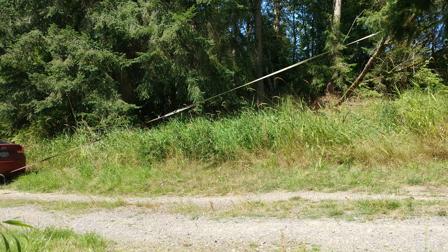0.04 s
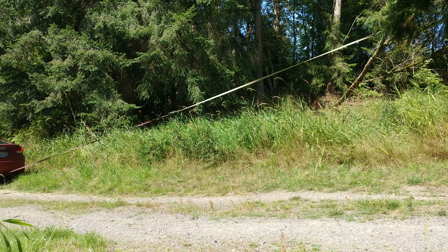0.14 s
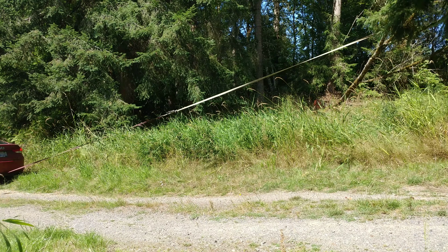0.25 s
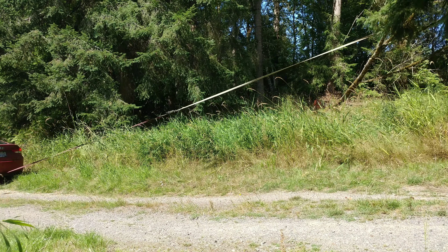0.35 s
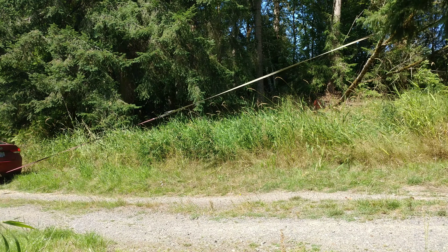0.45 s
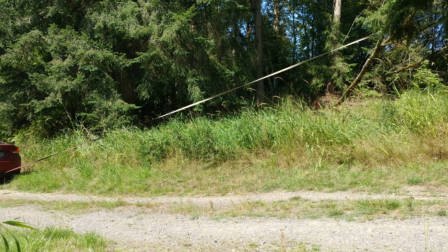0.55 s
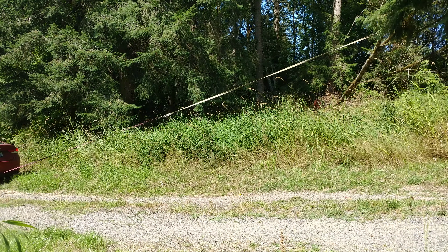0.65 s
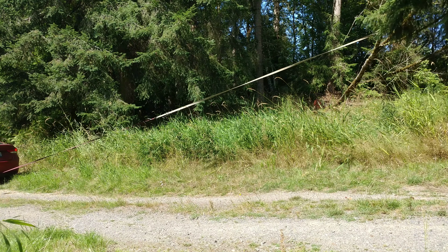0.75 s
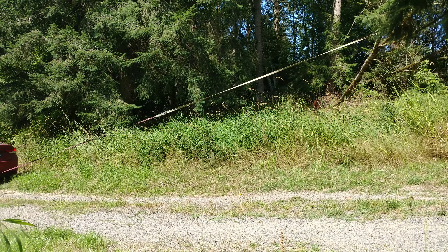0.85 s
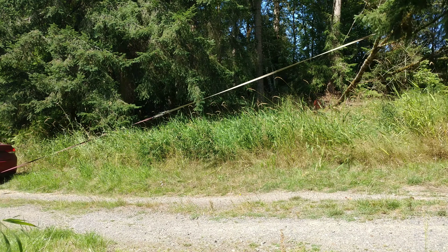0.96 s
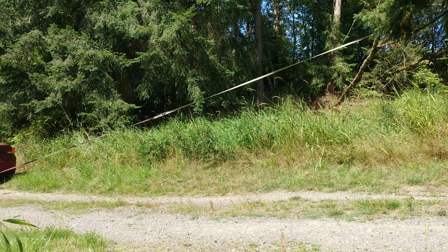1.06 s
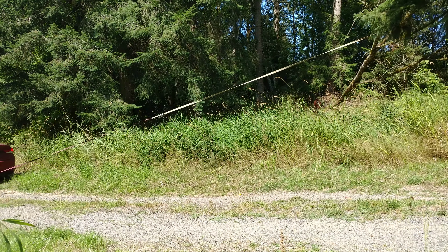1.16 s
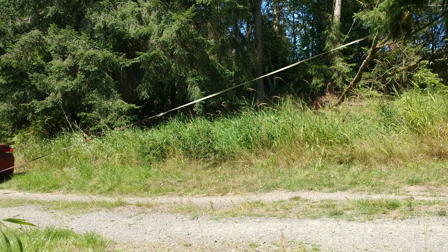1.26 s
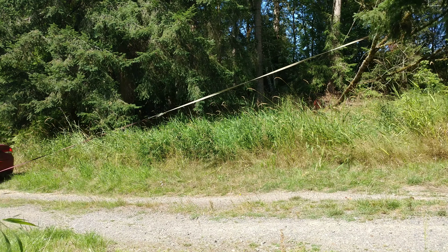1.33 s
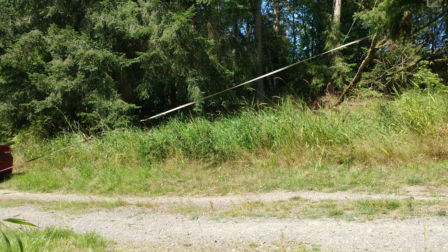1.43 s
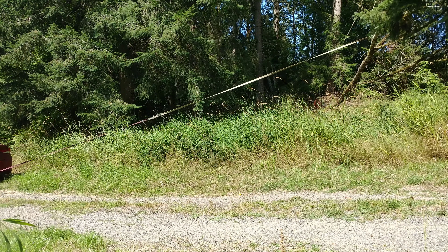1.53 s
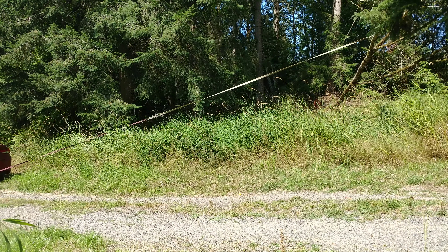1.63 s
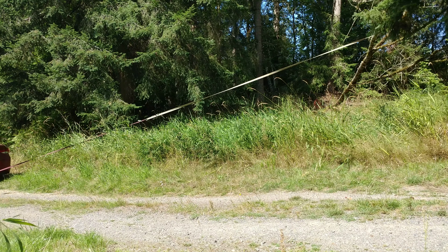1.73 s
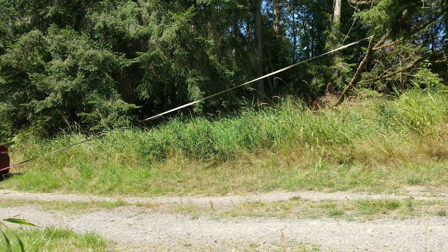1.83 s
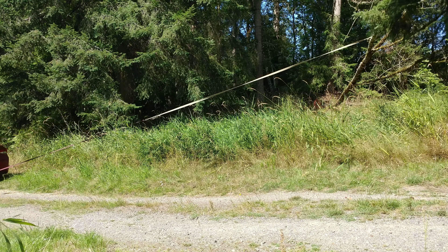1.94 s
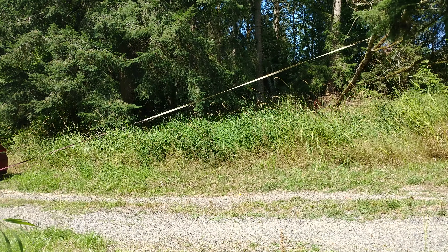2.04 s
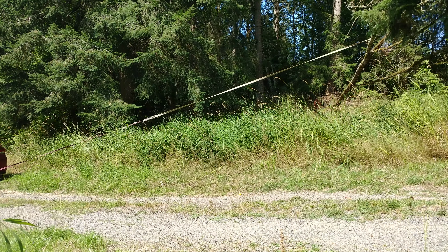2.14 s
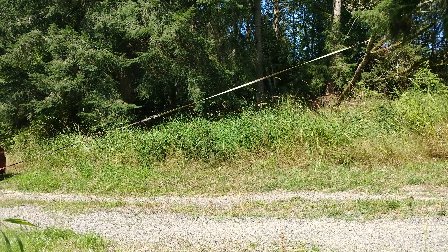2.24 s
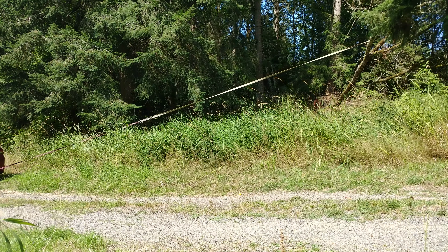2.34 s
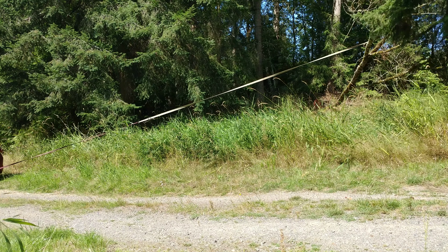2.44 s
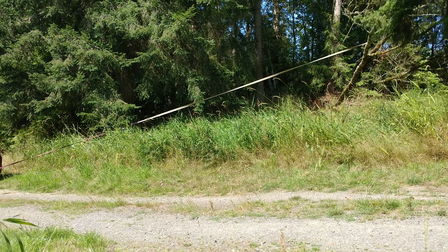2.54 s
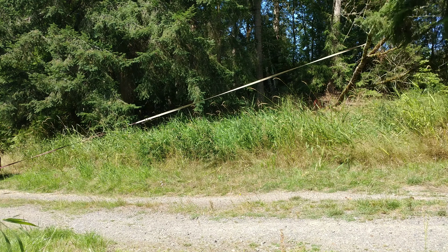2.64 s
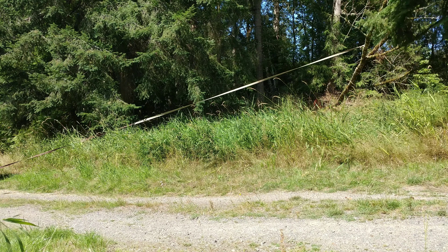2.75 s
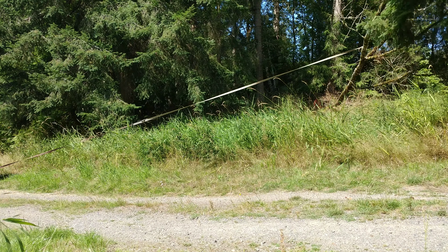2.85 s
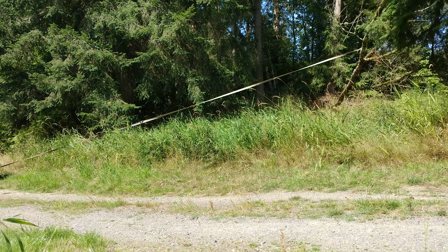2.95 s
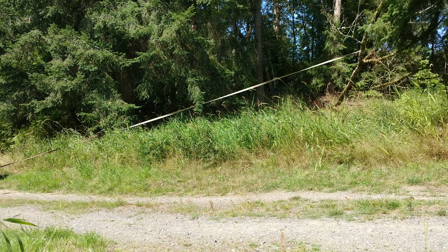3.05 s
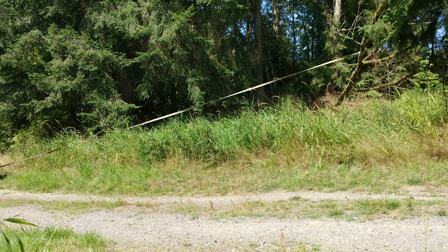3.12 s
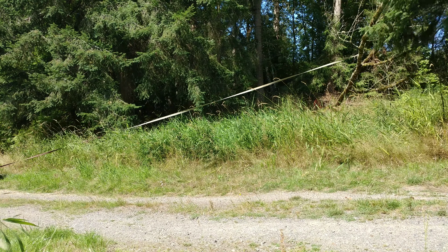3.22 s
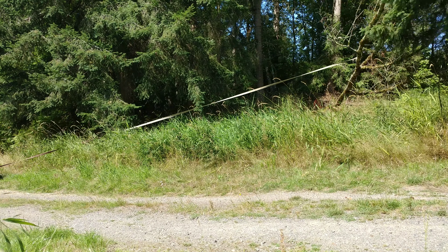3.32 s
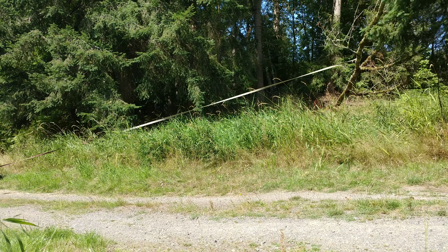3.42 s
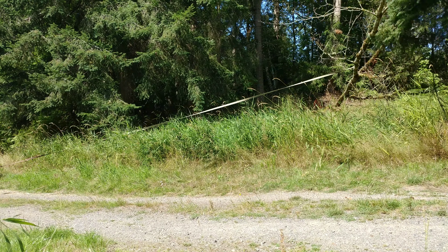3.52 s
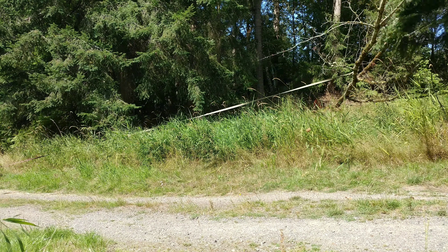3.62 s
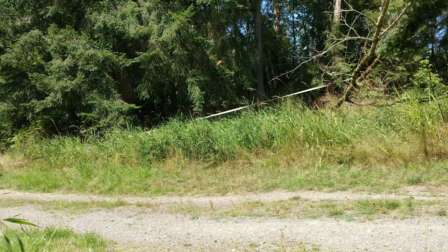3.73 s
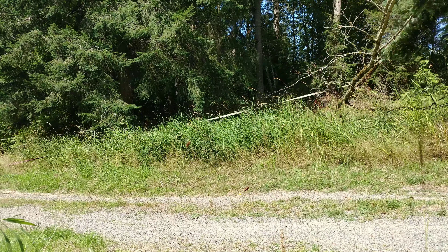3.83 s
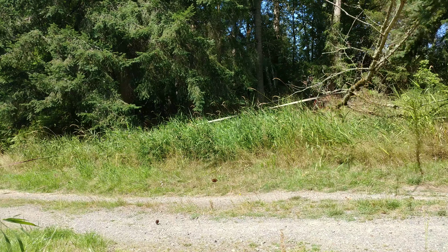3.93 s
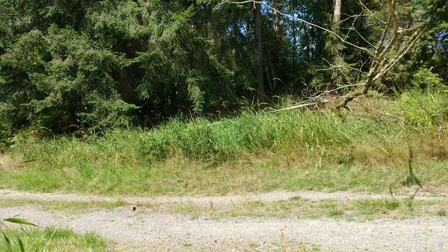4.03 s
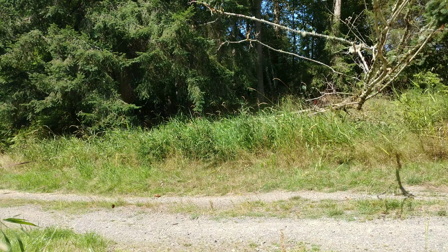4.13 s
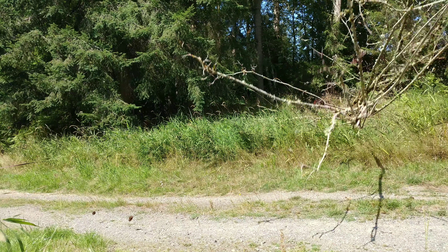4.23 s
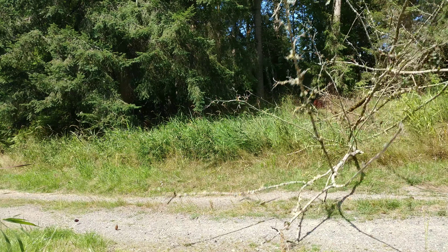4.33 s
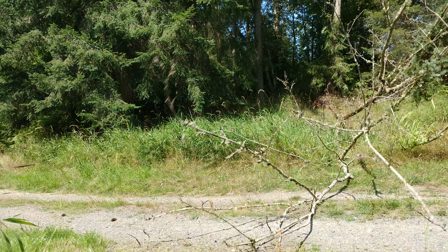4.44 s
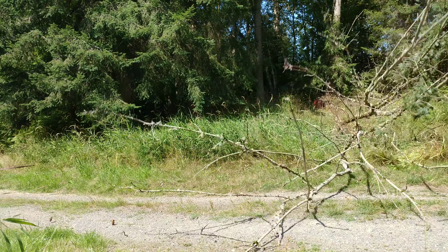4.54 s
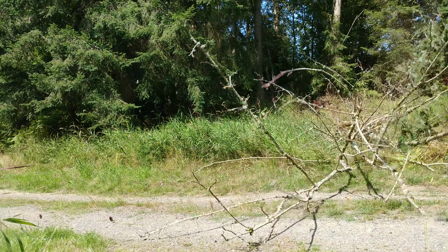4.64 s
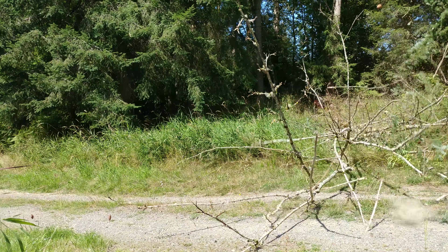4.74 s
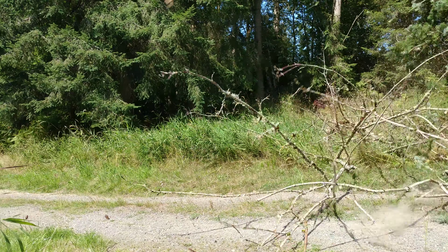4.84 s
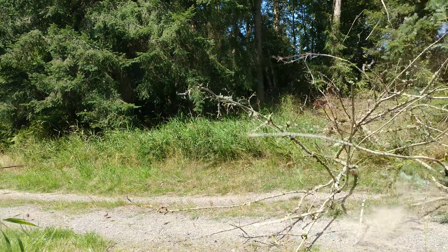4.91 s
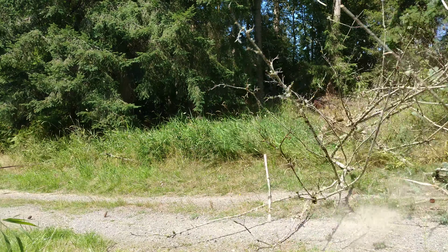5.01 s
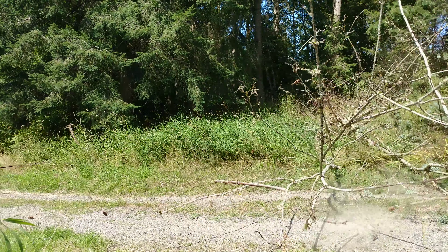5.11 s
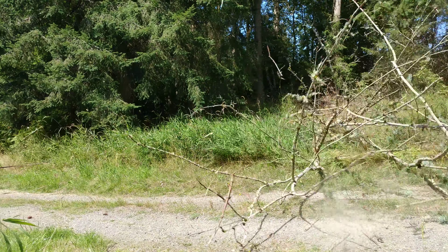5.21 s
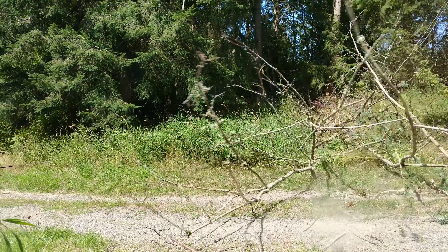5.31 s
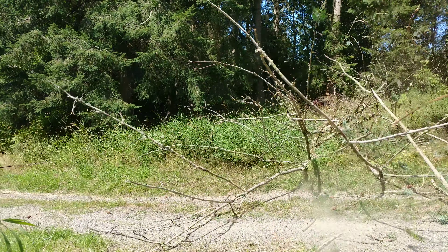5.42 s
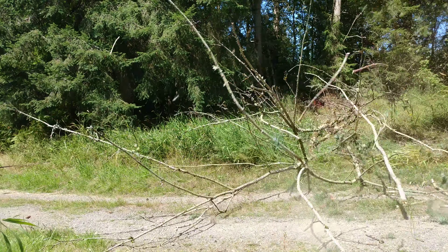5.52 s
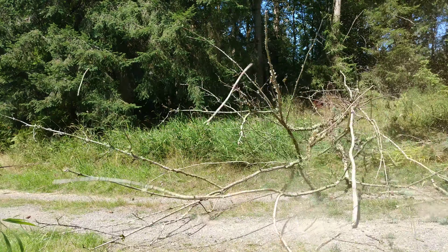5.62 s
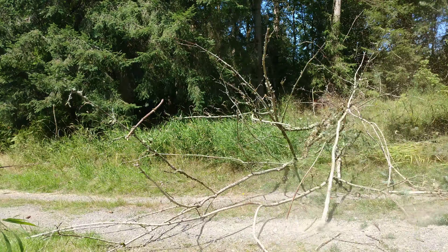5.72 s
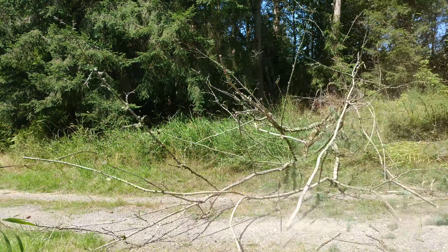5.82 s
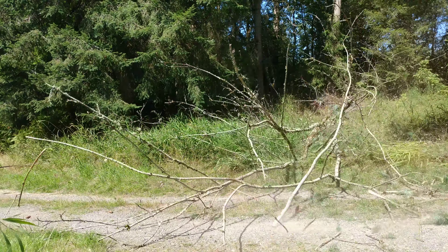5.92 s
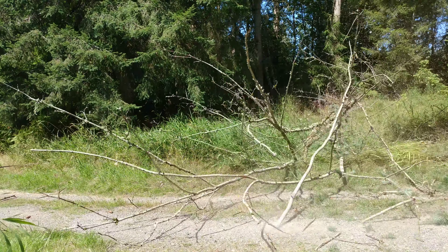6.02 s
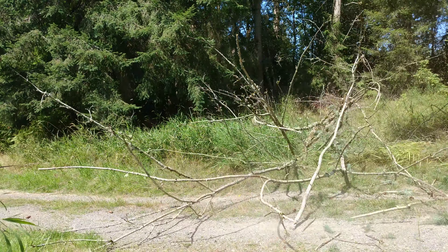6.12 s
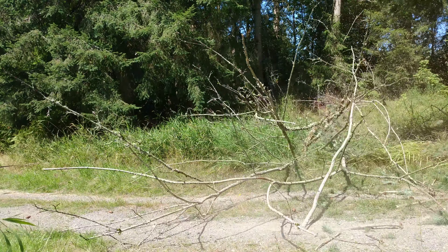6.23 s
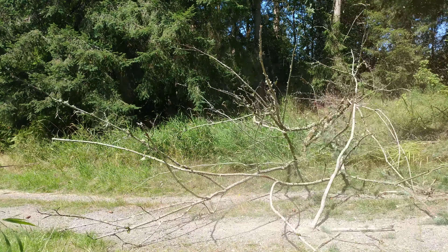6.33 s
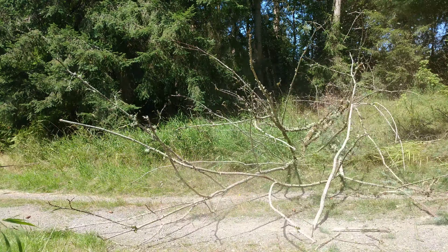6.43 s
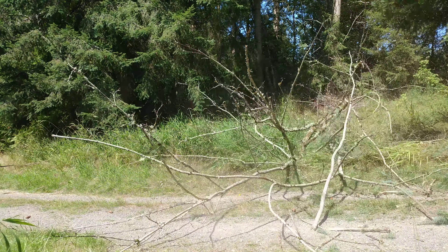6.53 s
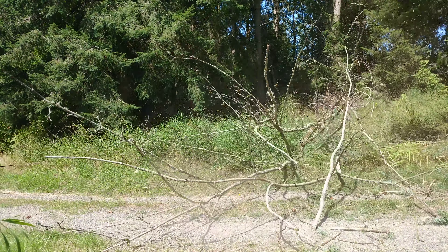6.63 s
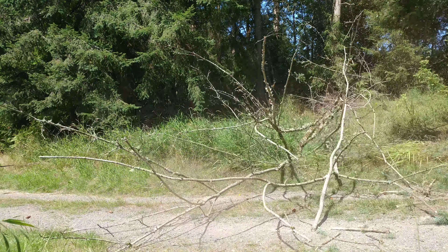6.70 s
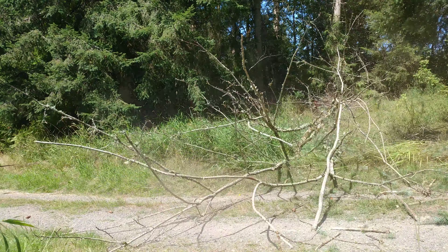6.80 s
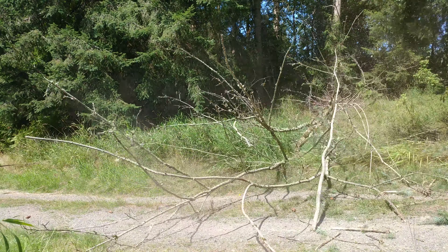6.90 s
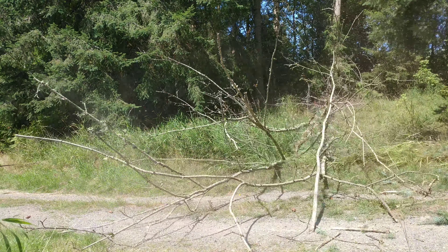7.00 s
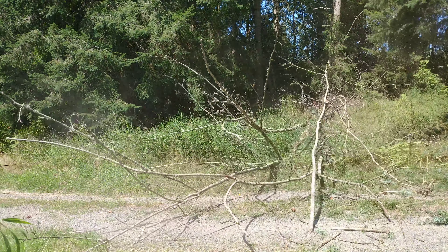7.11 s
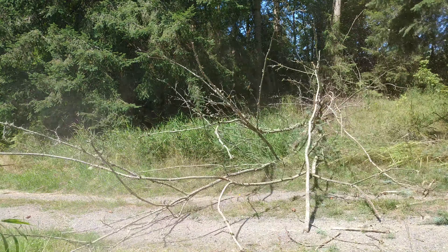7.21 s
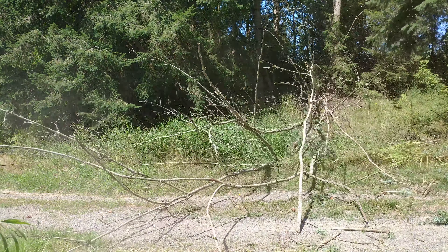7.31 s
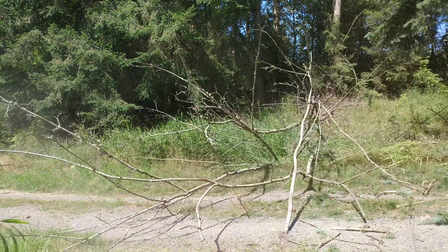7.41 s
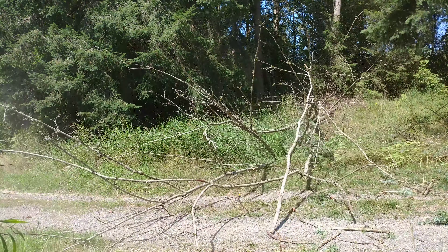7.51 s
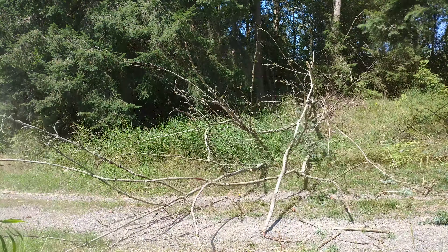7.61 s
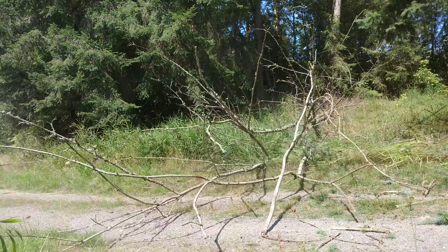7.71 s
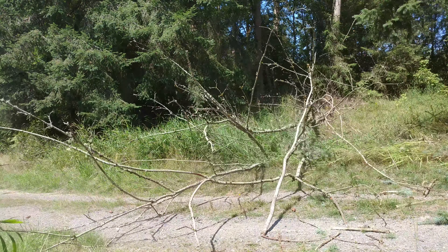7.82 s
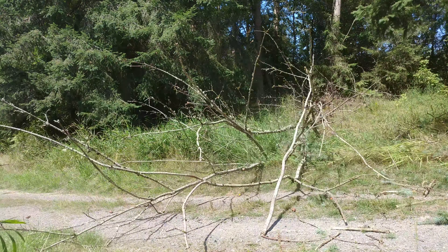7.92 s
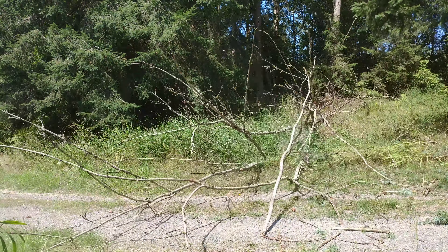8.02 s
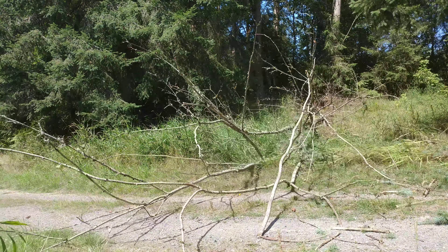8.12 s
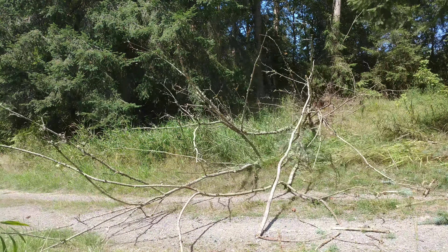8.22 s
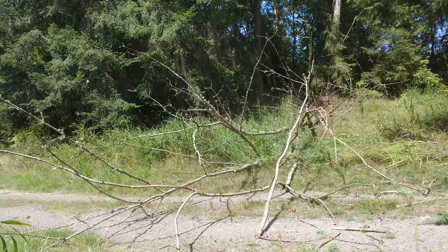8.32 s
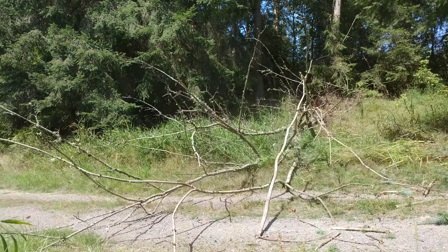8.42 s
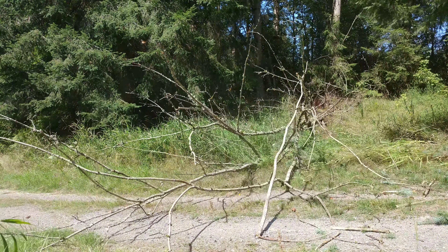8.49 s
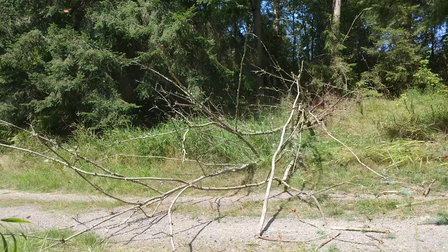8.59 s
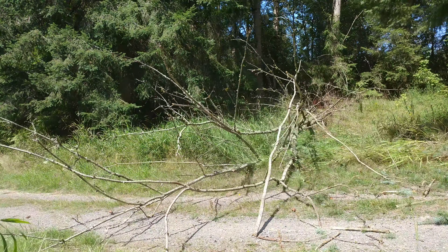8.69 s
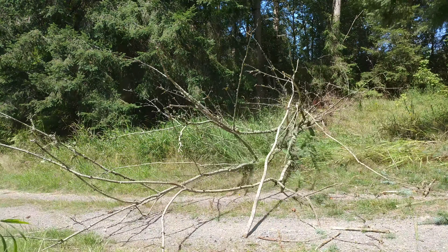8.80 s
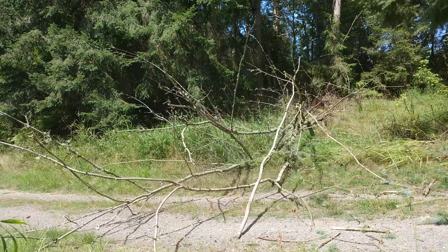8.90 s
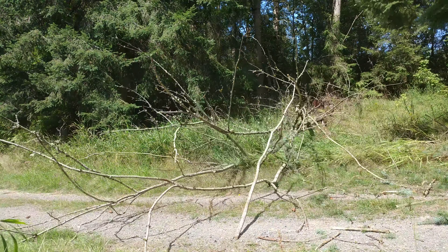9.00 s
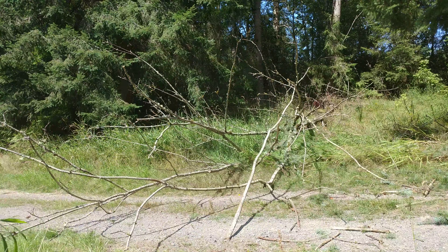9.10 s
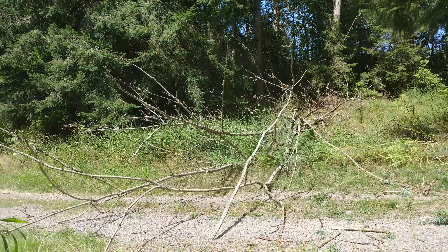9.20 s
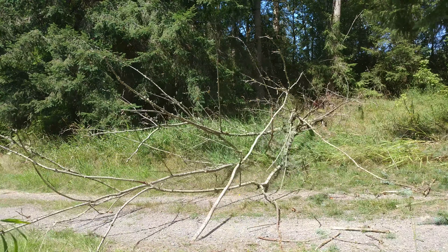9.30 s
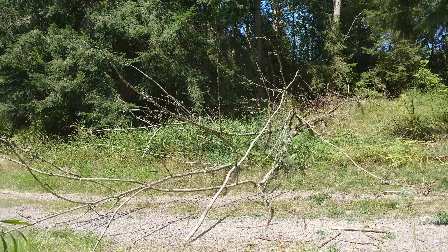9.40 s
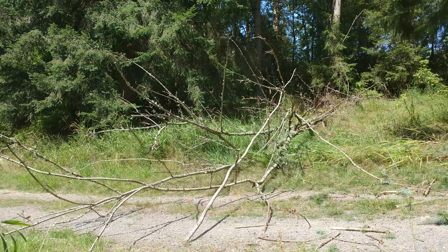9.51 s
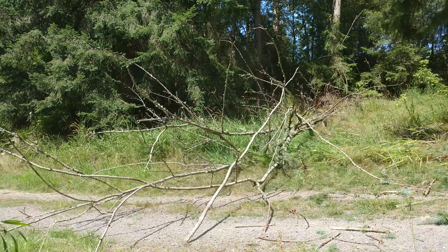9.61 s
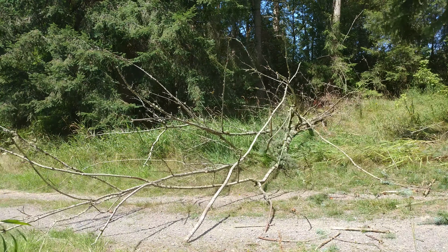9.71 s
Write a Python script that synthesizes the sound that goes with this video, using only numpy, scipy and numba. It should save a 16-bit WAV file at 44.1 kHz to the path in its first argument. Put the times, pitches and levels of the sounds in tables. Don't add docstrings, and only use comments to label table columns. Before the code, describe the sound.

Open air at a wood's edge, small stereo microphone some metres off, faint low engine idle and light wind rumble. From 0 to 1.8 s, sparse dry ticks and small fibre cracks, each returned briefly by the trunks. A stronger crack at 1.9 s with a low thud, another at 2.7 s. From 2.9 s a crackle of twigs and grinding limbs grows, snaps coming faster through 3.4 to 4.4 s. At about 4.6 to 5 s the crown lands: the loudest dense splintering, hard bright snaps, raining debris and a broad ground thud, peaks clipping. Heavy breaking continues to 5.6 s, a sharp snap at 5.94 s, then rapid thinning with small ticks until 7. At 7.3 s a dry crack; at 7.6 s a loud snap cluster and soft limb drop. After 8 s only faint needle rustle, tiny ticks and soft wind puffs, to about 9.7 s.

```python
import sys
import numpy as np
from scipy import signal
from scipy.fft import rfft, irfft, next_fast_len
from scipy.io import wavfile
from scipy.ndimage import uniform_filter1d
from numba import njit

SR = 44100
rng = np.random.default_rng(int(sys.argv[2]) if len(sys.argv) > 2 else 0)


def inscribe(sig):
    pcm = np.round(np.clip(np.atleast_2d(sig).T, -1, 1) * 32767)
    wavfile.write(sys.argv[1], SR, pcm.astype(np.int16))


def convert_level_to_amplitude(level_db):
    exponent = np.asarray(level_db, float) / 20
    return 10 ** exponent


N = 429975
T = np.arange(N) / SR

# start_s, peak level_db, pitch_hz
TWIG_TICKS = [(0.4864, -33, 5280), (0.9128, -34, 9030), (3.395, -12, 1820), (4.4021, -9, 4500),
              (4.6532, -4, 5100), (4.78, 0, 4900), (4.9163, 1, 3850), (5.277, -8, 4400),
              (5.2905, -9.5, 1530), (5.3138, -9, 2620), (5.3805, -18.5, 1540), (5.4326, -16, 3230),
              (5.4695, -11.5, 4730), (5.5739, -6.5, 6250), (5.835, -14.5, 2760), (6.0828, -17.5, 2740),
              (6.593, -30, 3500), (7.317, -22, 1850), (7.9149, -34, 2104)]
# start_s, length_ms, level_db, pitch_hz
LIMB_KNOCKS = [(.6285, 7.14, -33, 3740), (.7705, 7, -32.5, 3630), (5.703, 40, -28, 980),
               (5.885, 60, -29, 1006), (6.225, 50, -40.5, 1050), (7.284, 13.95, -22.5, 690),
               (7.582, 28, -20, 600), (5.615, 40, -24.5, 1006), (5.767, 23, -19, 980),
               (1.912, 30, -30, 589), (4.04, 45, -26.5, 1400), (9.459, 9.6, -35.5, 1020),
               (8.88, 60, -55, 1000), (3.866, 19, -30, 1400), (8.96, 90, -54, 900), (9.17, 90, -56, 950),
               (9.39, 60, -49, 1100), (5.212, 18, -22, 1600)]
# start_s, splintering_ms, crack_db, limb_knock_db
BARKY_ALOFT = [(.3038, 5.9, -39, -53), (.3901, 3.8, -48, -53), (.5927, 7.6, -46, -67),
               (.6076, 7.9, -46, -67), (1.3649, 3.85, -29, -36), (1.6403, 10.2, -37.5, -48.5),
               (2.5387, 3.4, -26.5, -37.5), (3.0147, 19.7, -33, -31.5), (3.0945, 6.8, -30, -41),
               (3.281, 4.5, -28, -41), (3.6452, 5.7, -18.5, -36), (3.6637, 30, -30.5, -45.5),
               (3.8069, 16, -47, -39), (3.8852, 6.4, -27, -30.5), (3.9306, 7, -25, -28),
               (3.9635, 12, -28, -24.5), (4.0977, 6, -32, -38), (4.2858, 12, -18, -33.5),
               (4.3541, 17, -20.5, -26), (4.3915, 13, -30.5, -37.5), (4.455, 36, -23, -24),
               (4.5896, 3, -15, -43.5)]
# start_s, splintering_ms, crack_db, limb_knock_db
BARKY_GROUNDED = [(4.6245, 15, -25, -39), (4.6434, 12, -22.5, -39), (4.6759, 43.5, -16.5, -20),
                  (4.805, 29.6, -17.5, -14.5), (4.8365, 40.3, -19.5, -15), (5.2541, 9.7, -21, -37),
                  (5.3927, 44, -38, -40), (5.526, 12, -29, -28.5), (5.5344, 20, -16.5, -20.5),
                  (5.6816, 9.3, -27, -46), (5.787, 6, -25, -33), (6.4174, 17.3, -44, -44.5),
                  (6.6688, 6.7, -38.5, -61), (6.8869, 13.5, -41.5, -57), (7.1004, 43, -46, -43.5),
                  (7.2804, 14, -27, -24), (8.6074, 19, -54, -59), (8.84, 72, -64, -63)]
# start_s, splintering_ms, crack_db, limb_knock_db
BARK_SHREDS = [(.3542, 4.1, -45.5, -56), (.7308, 4.2, -54, -91), (1.7864, 3.5, -36.5, -49),
               (1.8533, 7.3, -45, -44), (2.876, 6.9, -40, -37), (3.4816, 16, -37.5, -26),
               (3.5624, 40, -43.5, -31), (3.9525, 7.4, -32.5, -35.5), (5.7025, 10, -39, -40),
               (7.247, 5, -46, -60), (8.22, 72, -67, -69), (8.8279, 5.7, -44.5, -58)]
# start_s, splintering_ms, crack_db, limb_knock_db
BARE_BRANCHES = [(.4305, 3.5, -27, -45), (.6864, 11.5, -39.5, -71), (.7613, 7.3, -37, -63),
                 (1.531, 5.1, -37, -70), (1.6927, 17.4, -36.5, -41.5), (1.7705, 4.8, -26.5, -62),
                 (1.8997, 7, -17, -24.5), (1.908, 42.6, -27.5, -32), (2.0873, 16.6, -37, -55),
                 (2.2244, 16, -44, -49.5), (2.439, 3, -31, -44.5), (2.6764, 21.8, -14.5, -17.5),
                 (2.8121, 5.4, -27, -44.5), (2.9298, 13, -25, -29.5), (3.2182, 21, -32.5, -41.5),
                 (3.728, 19, -30, -38.5), (4.2139, 38, -21, -31.5), (4.7592, 28, -12.5, -18),
                 (4.9338, 31, -14.5, -25), (5.0785, 12, -26, -36), (5.1104, 14, -18.5, -34.5),
                 (5.1762, 5, -18, -32.5), (5.2017, 7.9, -22.5, -39), (5.2097, 14, -12.5, -25),
                 (5.4786, 14.7, -24, -34.5), (6.2842, 14, -38, -52), (6.4898, 10.4, -32, -42.5),
                 (6.8779, 5.8, -34.5, -49), (7.8357, 48, -48, -48.5)]
# start_s, splintering_ms, crack_db, limb_knock_db
HEARTWOOD = [(.8915, 6.1, -42.5, -65), (1.2741, 25, -45, -54), (1.7171, 13.7, -40, -45),
             (2.1247, 9.6, -36.5, -42.5), (2.712, 8.1, -18, -30.5), (3.2017, 11, -24, -35.5),
             (3.417, 9.5, -17.5, -25), (4.1251, 4, -15, -28.5), (4.5616, 9, -19, -33),
             (5.0156, 20.3, -15.5, -22.5), (5.1044, 5.2, -15.5, -30), (5.8826, 14, -25.5, -31),
             (5.9425, 4, -13, -28), (5.9999, 30, -35, -32), (6.001, 8.2, -23, -35),
             (6.1485, 13.5, -23.5, -31.5), (6.2219, 18, -35, -39.5), (6.5576, 19, -43.5, -44),
             (7.037, 13, -36, -42.5), (7.268, 16, -29, -32), (7.569, 13.5, -27, -26.5),
             (7.5818, 17, -19, -29.5), (8.1061, 7.7, -42, -43), (9.3368, 30, -56, -44),
             (9.3747, 20, -70, -43), (9.442, 42.4, -50.5, -42), (9.5663, 20, -71, -55.5),
             (9.7025, 14.3, -51, -43)]


def snaps():
    rows = [(s, 2.5, db - 17, db - 9, hz, db - 21) for s, db, hz in TWIG_TICKS]
    # rows, crack pitch_hz, bark tick against crack in dB
    kinds = [(BARKY_ALOFT, 3800, -0.36), (BARKY_GROUNDED, 4300, -1.6), (BARK_SHREDS, 3800, 8.8),
             (BARE_BRANCHES, 3880, -8.5), (HEARTWOOD, 3390, -14.5)]
    for table, hz, bark_db in kinds:
        for s, ms, crack, knock in table:
            thick_db = np.clip(knock - crack + 10.5, -8, 25)
            rows.append((s, ms, knock, crack, hz * 2 ** (-0.0479 * thick_db), crack + bark_db))
    s, ms, knock_db, crack_db, hz, tick_db = np.transpose(rows)[:, :, None]
    out = burst(s, ms, crack_db, hz, 0.53, 1.59, lead=2.8)
    out += burst(s, ms, tick_db, 9520, 0.5, 2.0, lead=2.4)
    out += burst(s + 0.002126, ms, knock_db, 988, 0.448, 3.86, lead=0)
    out += burst(s + 0.0059, ms, knock_db - 7.5, 330, 0.581, 3.5, lead=0)
    return out + burst(*np.transpose(LIMB_KNOCKS)[:, :, None], .14, 4.0, lead=0)


# start_s, peak level_db, pitch_hz
DRY_CLICKS = [(.4305, -15, 4800), (.487, -32, 2500), (1.3649, -26, 1500), (2.9009, -23, 5000),
              (3.0141, -16, 4030), (3.2276, -16, 4500), (3.3593, -21, 2500), (3.492, -17, 8800),
              (3.5654, -14, 4060), (3.6447, -8, 4730), (3.680, -13, 8800), (3.737, -19, 2460),
              (3.8118, -19, 5170), (3.9625, -10, 4370), (4.09, -17, 6000), (4.163, -15, 2990),
              (4.2159, -11, 3890), (4.4444, -11, 4500), (4.5621, -8, 3500), (4.589, -7, 8200),
              (4.6283, -9, 3990), (4.765, -3, 3530), (4.848, -2, 1500), (4.871, -5, 3000),
              (5.1586, -12, 2130), (5.176, -9, 3940), (5.5347, -6, 2530), (5.6205, -17, 2450),
              (5.7412, -19, 2500), (5.7896, -13, 8580), (5.836, -15, 5000), (5.9123, -22, 5000),
              (5.9418, -3, 3870), (5.97, -22, 8500), (6.025, -24, 2500), (6.056, -27, 8500),
              (6.088, -25, 2700), (6.108, -25, 7000), (6.126, -26, 8000), (6.1947, -25, 3500),
              (6.245, -29, 2000), (6.385, -33, 6000), (7.2922, -9, 7000), (7.5911, -4, 3390),
              (7.605, -8, 6500), (7.616, -16, 4000), (7.68, -21, 8500), (7.7113, -16, 8500),
              (7.8375, -30, 2800), (7.8644, -27, 7000), (8.753, -46, 1900), (8.793, -43, 2900),
              (9.04, -46, 4200), (9.21, -49, 4000), (9.24, -47, 3400), (9.265, -47, 2900), (9.3, -47, 2200),
              (9.335, -45, 1900), (9.545, -45, 3800), (9.57, -50, 3500)]


def clicks():
    s, db, hz = np.transpose(DRY_CLICKS)[:, :, None]
    snap = burst(s, 1.5 + 0 * s, db - 9, hz, .45, 1.6, lead=3.0)
    tail = burst(s + .002, 14 + 0 * s, db - 23, hz, .4, 2.2, lead=0)
    return snap + tail


# start_s, length_ms, level_db, pitch_hz
NEEDLE_SPRAYS = [(.432, 18, -41, 4800), (.772, 14, -41, 3500), (1.368, 40, -43, 1300),
                 (1.645, 25, -46, 2500), (1.9, 50, -30, 2600), (2.68, 40, -27, 2100), (3.43, 45, -31, 1500),
                 (3.99, 60, -30, 1300), (4.69, 60, -22, 1100), (5.89, 20, -33, 2400), (6.01, 35, -35, 2200),
                 (6.085, 25, -37, 2700), (6.155, 25, -33, 2200), (6.23, 40, -39, 2000),
                 (7.575, 40, -27, 1100), (7.6, 50, -34, 8800), (8.9, 80, -57, 4000), (9.02, 50, -54, 4600),
                 (9.2, 45, -57, 3900), (9.24, 40, -55, 3200), (9.28, 40, -56, 2400), (9.32, 30, -54, 1900)]


def sprays():
    return burst(*np.transpose(NEEDLE_SPRAYS)[:, :, None], .3, 2.4, lead=0)


def burst(s, ms, db, hz, octaves, cycles, lead):
    splinters = 72
    length = np.clip(ms, 1, 90) / 1000
    wait, pitch, size = np.moveaxis(rng.standard_normal((len(s), splinters, 3)), 2, 0)
    first = np.arange(splinters) == 0
    wait = 1.25 * (1 - np.exp(-.9 * np.abs(wait))) * ~first
    fading = size * np.abs(size) ** 0.11 * np.exp(-.009 / length * wait)
    size = np.where(first, lead * np.sqrt(0.0051 / length), fading)
    bend = 2 ** (octaves * pitch * ~first)
    size = size / np.sqrt(np.sum(size ** 2 / bend, axis=1, keepdims=True))
    loudness = convert_level_to_amplitude(db) * np.sqrt(4.91 * length * hz / cycles)
    return grains(s + wait * length, hz * bend, cycles, size * loudness)


# start_s, lag_samples
LEFT_LAG = [(0, 9), (1, 8), (4.9, 8), (5.5, 6), (7.6, 4), (8.2, -1)]


def grains(s, hz, cycles, size):
    hz = np.clip(hz, 60, .4 * SR).ravel()
    start = (s.ravel() * SR).astype(np.int64)
    scatter = 2.5 * rng.standard_normal(hz.size)
    lag = np.interp(s.ravel(), *np.transpose(LEFT_LAG)) + scatter
    late = np.maximum(start + np.round(lag).astype(np.int64), 0)
    cycles = np.clip(cycles, .3, 40) * np.ones(hz.size)
    return np.array([ring(a, hz, cycles, size.ravel(), N, float(SR)) for a in (late, start)])


@njit
def ring(start, hz, cycles, size, count, rate):
    out = np.zeros(count)
    for k in range(len(start)):
        turn = np.exp((2j * np.pi - 1 / cycles[k]) * hz[k] / rate)
        rise = np.exp(-3 * hz[k] / rate)
        z, gap = size[k] + 0j, 1.
        for i in range(start[k], min(count, start[k] + int(6 * cycles[k] * rate / hz[k]))):
            z *= turn
            gap *= rise
            out[i] += z.imag * (1 - gap)
    return out


# start_s, twigs level_db, limbs_against_twigs_db
CROWN_EFFORT = [(0, -67.5, -4), (.35, -64.5, 1), (.76, -53, -0.5), (1.03, -70, 8.5), (1.25, -63, -5),
                (1.54, -52, -1.5), (2.28, -55.5, -1.5), (2.65, -53, 3.5), (2.85, -39.5, -3), (3.53, -35, 1),
                (3.91, -35.5, -7), (4.15, -27.5, 0), (4.6, -28.5, -2), (5.02, -30, -5.5), (5.7, -35.5, 6),
                (6.57, -56, 1.3), (8.42, -68.5, 7.5), (9.75, -76, 13)]
# peak_s, level_db, rise_s, fall_s, dust_against_twigs_db
DEBRIS = [(.7, -57, 0.068, 0.19, -11), (1.93, -41.5, 0.1, 0.14, -3), (4.69, -24, .04, .12, 0.5),
          (4.85, -19, .08, 0.08, -2), (7.36, -44, 0.081, 0.04, -6), (7.63, -38, .02, .06, 3),
          (7.72, -41, 0.057, 0.079, 3), (8.25, -63, 0.29, 0.043, 9.5), (8.86, -54, .02, 0.19, 3),
          (9.05, -54, 0.13, 0.09, 5), (9.28, -56.5, 0.15, .06, -12)]


def effort():
    twigs_db, thick_db = curve(CROWN_EFFORT)
    dust_db = twigs_db - 3 - 0.17 * (twigs_db + 35)
    twigs, dust = convert_level_to_amplitude(twigs_db) ** 2, convert_level_to_amplitude(dust_db) ** 2
    for s, db, rise, fall, more in DEBRIS:
        twigs = twigs + swell(s, db, rise, fall)
        dust = dust + swell(s, db + more, rise, fall)
    return twigs_db + thick_db, 10 * np.log10(twigs), 10 * np.log10(dust)


# pitch_hz, spread_octaves, ring_cycles, grains_per_s, size_scatter_db, smooth_share
LIMB_GRAINS = (950, 0.557, 5.0, 700, 2.4, 0.51)
# pitch_hz, spread_octaves, ring_cycles, grains_per_s, size_scatter_db, smooth_share
TWIG_GRAINS = (3606, 0.64, 1.4, 1200, 4.1, 0.33)
# pitch_hz, spread_octaves, ring_cycles, grains_per_s, size_scatter_db, smooth_share
DUST_GRAINS = (10440, 0.482, 2.2, 2800, 2.9, 0.33)


def crown_crackle():
    limbs_db, twigs_db, dust_db = effort()
    beds = [crackle(LIMB_GRAINS, limbs_db, count=12000), crackle(TWIG_GRAINS, twigs_db, count=30000),
            crackle(DUST_GRAINS, dust_db, count=40000)]
    return [sum(layer) for layer in zip(*beds)]


def crackle(kind, db, count):
    hz, octaves, cycles, rate, scatter_db, smooth = kind
    s, pick, pitch, size = rng.random((count, 4)).T
    size = (pick < rate * T[-1] / count) * convert_level_to_amplitude(-scatter_db * np.log(size + 0.012))
    pitch = np.log(pitch / (1 - pitch) + 1e-9) / 1.736
    bits = grains(s * T[-1], hz * 2 ** (octaves * pitch), cycles, size)
    band = [(hz * 2 ** (octaves * k), -4.0 * k * k) for k in range(-4, 5)]
    rub = ports(*colour(rng.standard_normal((2, N)), band))
    gain = convert_level_to_amplitude(db + 1.84 * walk(25) + .7 * walk(9))
    return gain * np.sqrt(1 - smooth) * unit(bits), gain * np.sqrt(smooth) * unit(rub)


# start_s, level_db
WOOD_SHARE = [(0, -4.5), (1.4, -2), (1.7, -5), (1.76, -8), (1.87, -8), (1.9, -4.5), (2.7, -5.5),
              (4.5, -4.5), (5.9, -14.5), (7.0, -6.5), (7.6, -3), (9.75, -7)]
# pitch_hz, t60_s
WOOD_DECAY = [(200, 0.95), (600, 0.39), (1500, 0.64), (4000, 0.46), (10000, 0.49)]
TRUNK_ROWS = [0, .04, .1, .2, .4]


def wood_echo(breaks, bits):
    x = convert_level_to_amplitude(curve(WOOD_SHARE)[0]) * breaks + convert_level_to_amplitude(-3.5) * bits
    t = T[:SR]
    decay_hz, decay_s = np.transpose(WOOD_DECAY)
    out = 0
    for hz in 150 * 2 ** np.arange(7):
        t60 = np.interp(np.log(hz), np.log(decay_hz), decay_s)
        band = [(hz / 2, -40), (hz / 1.4, 0), (hz * 1.252, 0), (hz * 2, -40)]
        out = out + colour(rng.standard_normal((2, SR)), band) * convert_level_to_amplitude(-60 * t / t60)
    out = ports(*out) * (1 - np.exp(-t / 0.0024)) * (1 + 0.45 * np.exp(-t / 0.017))
    out = out / np.sqrt(np.sum(out ** 2) / 2)
    echo = 0
    for row in np.eye(len(TRUNK_ROWS)):
        belt = np.sqrt(np.interp(t, TRUNK_ROWS, row))
        flutter = unit(np.resize(np.tanh(3 * walk(200))[::3], N))
        echo = echo + signal.fftconvolve((x * flutter)[None], out * belt, axes=1)[:, :N]
    return echo


def sheen_change(tree):
    sheen = colour(tree, [(10000, -62), (11200, -6.5), (20000, -2.5)])
    landed_s, rustle_s, settle_s = 5.7, 8.7, .1
    times = [landed_s - settle_s, landed_s + settle_s, rustle_s, rustle_s + settle_s]
    sheen_db = np.interp(T, times, [1.1, -10, -10, 1.1])
    return (convert_level_to_amplitude(sheen_db) - 1) * sheen


# pitch_hz, level_db
GROUND_COLOUR = [(25, -22.5), (50, -6.5), (75, 5), (130, -2), (250, -15), (450, -16.5), (900, -44)]
# peak_s, level_db, rise_s, fall_s
GROUND_THUDS = [
    (1.93, -35.5, .03, 0.13),
    (2.74, -25.5, 0.044, 0.04),
    (3.5, -33, 0.14, 0.24),
    (4.8, -25, 0.23, 0.23),
    (7.32, -44, 0.025, 0.055),
    (7.61, -29, 0.015, .07),
    (7.93, -50, .03, .06),
    (8.67, -58, .05, .05),
    (9.3, -45.5, 0.057, .1),
]


def ground():
    mid, side = colour(rng.standard_normal((2, N)), GROUND_COLOUR)
    side = colour(side, [(30, 12), (60, -2), (150, -1)])
    bass = unit(mid + .36 * side * np.array([[1], [-1]])) * convert_level_to_amplitude(2.02 * walk(12))
    shake = convert_level_to_amplitude(-19 + 0.58 * curve(CROWN_EFFORT)[0]) ** 2
    wind = convert_level_to_amplitude(-50 - 6.4 * np.clip((T - 9.5) / 0.17, 0, 1)) ** 2
    return bass * np.sqrt(wind + shake + sum(swell(*row) for row in GROUND_THUDS))


# multiple, level_db
IDLE_HARMONICS = [(2.0, -55), (3.0, -55), (4.0, -62), (5.0, -69.5)]
# start_s, level_db
ENGINE_FADE = [(0, -14.5), (3, -15), (6, -16.5), (7, -21), (9.75, -22)]


def engine():
    turn = 2 * np.pi * np.cumsum(25.2 * (1 + 0.03 * walk(2.4))) / SR
    hum = sum(convert_level_to_amplitude(db + 19 + 3.2 * walk(16)) * np.sin(round(k) * turn) for k, db in IDLE_HARMONICS)
    return hum * convert_level_to_amplitude(curve(ENGINE_FADE)[0])


# peak_s, level_db, rise_s, fall_s
WIND_PUFFS = [
    (.35, -52, .15, .2),
    (.75, -52, .1, .1),
    (1.7, -47, .3, .15),
    (4.6, -47, .1, .1),
    (6.5, -47, .1, .1),
    (7.0, -52, .1, .1),
    (7.93, -39, .04, .06),
    (8.67, -39, .05, .06),
    (9.12, -41, .05, .05),
    (9.35, -42, .06, .08),
]
# pitch_hz, level_db
PUFF_COLOUR = [(18, -22), (35, -13), (55, 0), (75, -4), (110, -22), (200, -45)]


def puffs():
    mid, side = colour(rng.standard_normal((2, N)), PUFF_COLOUR)
    power = convert_level_to_amplitude(-57 + 4 * walk(3)) ** 2 + sum(swell(*row) for row in WIND_PUFFS)
    return unit(mid + .55 * side * np.array([[1], [-1]])) * np.sqrt(power)


def ports(mid, side):
    side = colour(side, [(100, -22.5), (400, -10.0), (1000, -4.5), (1800, 1.0), (16000, 1)])
    return np.array([mid + side, mid - side])


def swell(s, db, rise, fall):
    pace = np.where(T < s, max(rise, .005), max(fall, .005))
    return convert_level_to_amplitude(db) ** 2 * np.exp(-2 * np.abs(T - s) / pace)


def walk(rate):
    k = int(SR / rate)
    held = np.repeat(rng.standard_normal(N // 200 + 1)[:N // k + 1], k)
    return 1.72 * uniform_filter1d(uniform_filter1d(held, k), k)[:N]


def curve(table):
    s, *columns = np.transpose(table)
    return [np.interp(T, s, c) for c in columns]


def colour(x, points):
    hz, db = np.transpose(points)
    size = next_fast_len(x.shape[-1] + 4096)
    f = np.log(np.fft.rfftfreq(size, 1 / SR) + 1)
    return irfft(rfft(x, size) * convert_level_to_amplitude(np.interp(f, np.log(hz), db)), size)[..., :x.shape[-1]]


def unit(x):
    return x / np.sqrt(np.mean(x ** 2))


def scene():
    breaks = snaps()
    bits, rub = crown_crackle()
    tree = breaks + bits + rub + wood_echo(breaks[1], bits[1])
    tree = tree + sheen_change(tree)
    return tree + clicks() + sprays() + ground() + engine() + puffs()


def top_cut(x):
    return signal.sosfilt(signal.butter(12, 16740, fs=SR, output="sos"), x)


# pitch_hz, level_db
PORT_COLOUR = [(15, -33.5), (30, -7), (60, -8.5), (1500, 1.5), (5200, 3.5), (7000, 0.5), (9000, 7.5),
               (9900, -2.5), (10400, -11), (10900, -10), (11600, -3.5), (13400, 3.5), (15500, 3)]
# pitch_hz, left_minus_right_db
PORT_TILT = [(125, -1.6), (700, .8), (2000, 2.6), (4500, 1.6), (8500, 7.3), (13000, 2.3)]


def record(dry):
    both = colour(dry, list(PORT_COLOUR) + [(15900, -12), (16050, -70)])
    left = colour(both[0], [(hz, db / 2) for hz, db in PORT_TILT])
    right = colour(both[1], [(hz, -db / 2) for hz, db in PORT_TILT])
    return top_cut(np.clip(np.array([left, right]), -1, 1))


dry = scene()
out = record(dry)
inscribe(out)
```